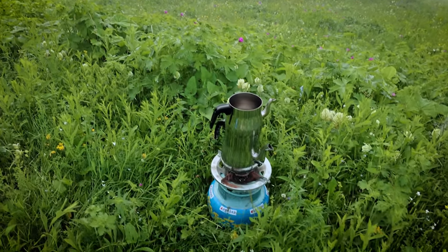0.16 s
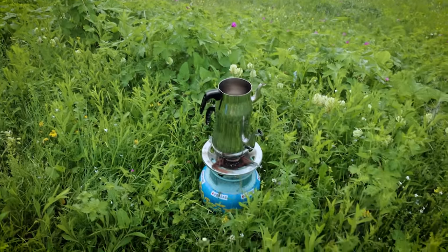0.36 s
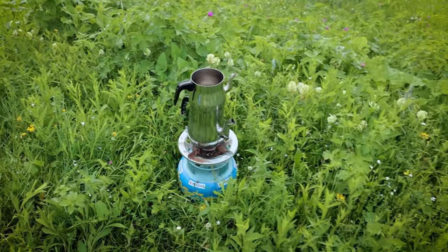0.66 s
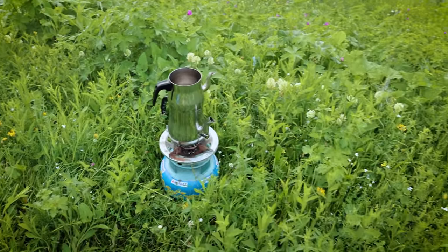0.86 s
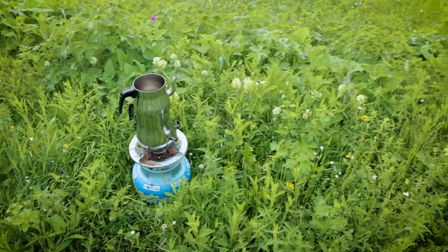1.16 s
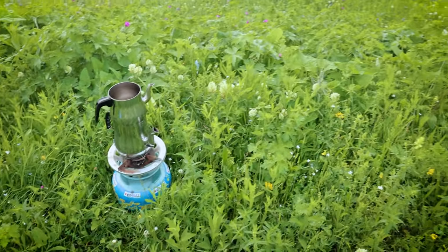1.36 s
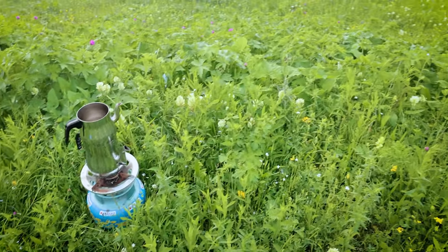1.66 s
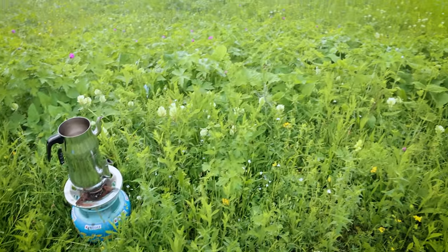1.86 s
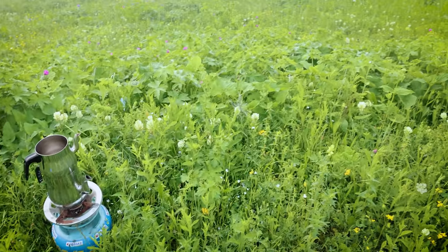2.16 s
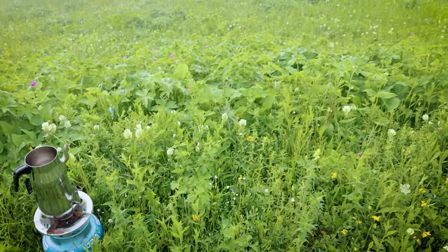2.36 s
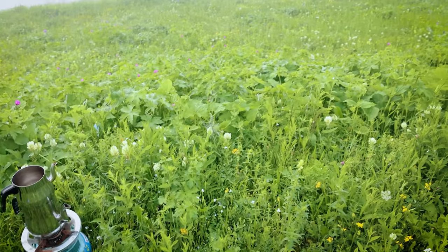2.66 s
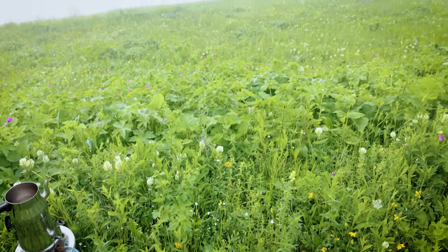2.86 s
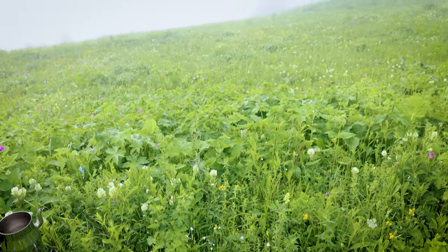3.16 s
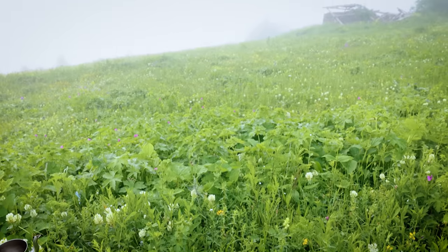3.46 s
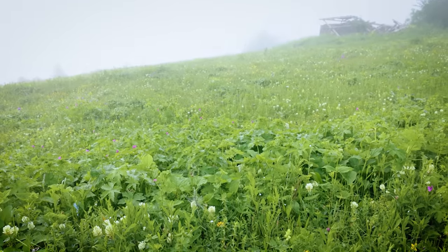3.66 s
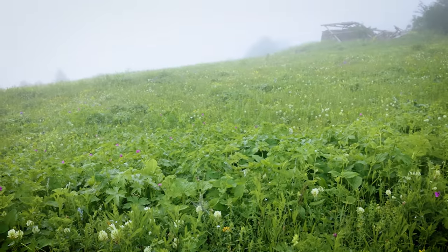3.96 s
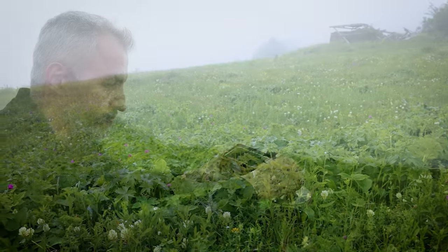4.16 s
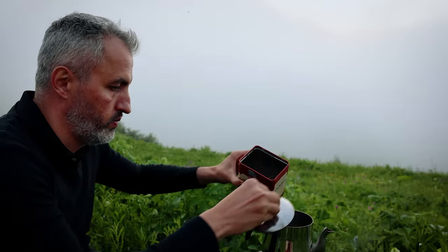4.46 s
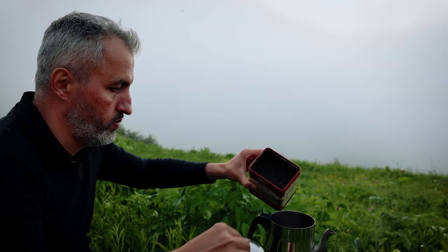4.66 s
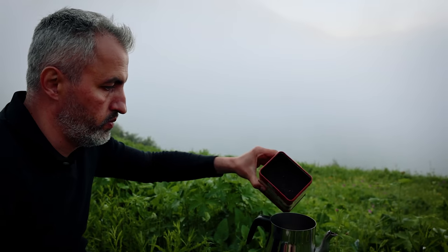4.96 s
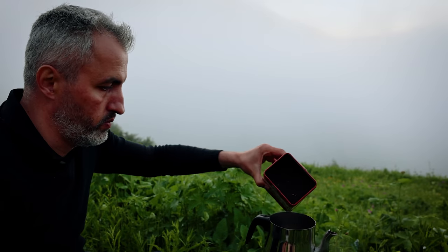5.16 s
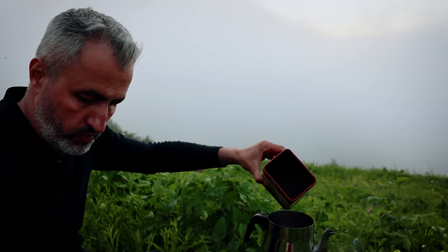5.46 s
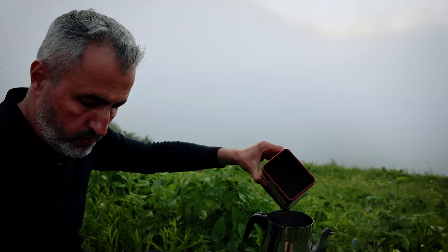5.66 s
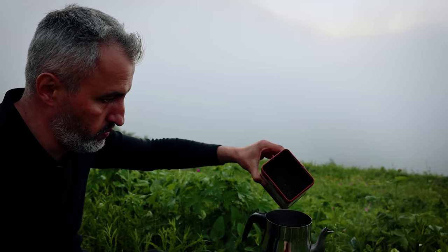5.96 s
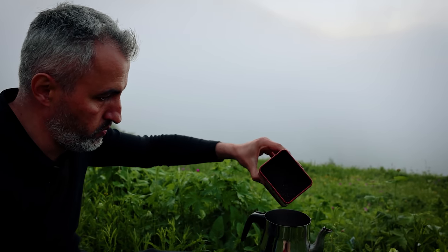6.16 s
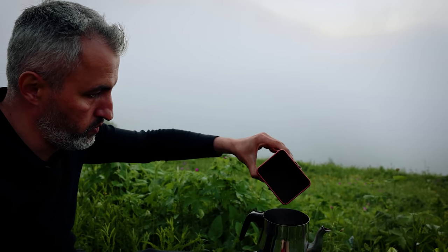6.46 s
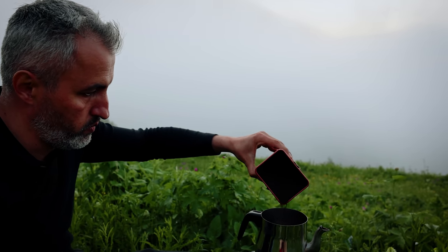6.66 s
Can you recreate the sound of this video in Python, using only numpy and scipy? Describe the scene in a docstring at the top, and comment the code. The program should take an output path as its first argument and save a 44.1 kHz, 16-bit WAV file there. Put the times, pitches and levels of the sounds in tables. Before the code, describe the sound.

From 0 to 4.3 seconds, a quiet meadow: soft, dull moving air, a faint grass stir at the start and again near 1.2, and many small distant birds making short, mostly falling whistles. Nearer birds slur clear tones between about 2 and 6 kHz; the strongest are a steep fall at 0.9, a rise at 1.2 and another fall at 1.4. Afterwards the calls are fainter, with two tiny grass ticks around 3.8. At 4.28 the scene switches almost instantly to a louder, close gas stove: resonant rushing gas, a wavering high hiss, low rumble and irregular little spits. At 5.98 a tin cracks once against a metal rim, ringing briefly before being choked. From 6.2 to 6.6 the flame flutters in low ragged puffs; the hiss surges near 6.8. Dry, open and almost mono.

```python
"""Songbirds whistle in long glides, some near and many far, over soft moving air in a mountain meadow.
Then, abruptly, a gas stove is close by: its jet hisses and its flame rumbles, flutters and spits under a teapot.
A tea tin knocks once against the pot's rim. Almost mono, with no walls around.
Birds are gliding sines with ground bounce and scatter; air, grass, gas and flame are shaped noise;
the knock is a crack of noise over decaying metal modes."""
import sys
import numpy as np
from scipy import signal
from scipy.fft import rfft, irfft, next_fast_len
from scipy.io import wavfile
from scipy.ndimage import map_coordinates

SR = 44100
rng = np.random.default_rng(int(sys.argv[2]) if len(sys.argv) > 2 else 0)


def store_pcm(level_fs):
    """Save levels as 16-bit WAV."""
    pcm = np.round(np.clip(level_fs, -1, 1) * 32767).astype(np.int16)
    wavfile.write(sys.argv[1], SR, np.atleast_2d(pcm).T)


N = 300321
STOVE_ON = 4.281  # (s) the stove replaces the meadow here


def amp(db):
    """Level law: decibels to amplitude gain."""
    return 10 ** (np.asarray(db) / 20)


def unit(x):
    """Normalisation: x at rms 1."""
    return x / np.sqrt(np.mean(x ** 2) + 1e-20)


def clock():
    """Sampling: the time of each sample in seconds."""
    return np.arange(N) / SR


def along(points, hz):
    """Logarithmic interpolation: (Hz, value) points read on a log frequency axis."""
    f, v = np.transpose(points)
    return np.interp(np.log(hz + 1), np.log(f + 1), v)


def curves(rows, t):
    """Linear interpolation: each column after the time, read at times t."""
    s, *cols = np.transpose(rows)
    return [np.interp(t, s, c) for c in cols]


def wobble(rate):
    """Slow modulation: a smooth random curve through rate knots a second."""
    t = clock()
    coarse = t[::32]
    knots = rng.standard_normal(2048)
    curve = map_coordinates(knots, [coarse * rate + 2], mode="wrap")
    return np.interp(t, coarse, curve)


def bell(x, centre, width):
    """Gaussian envelope: a rounded hump, width wide at half height."""
    return 2 ** -((2 * (x - centre) / width) ** 2)


def filtered(x, response):
    """Linear filtering: the spectrum of x times a response of frequency."""
    m = next_fast_len(N + SR // 2)
    hz = np.fft.rfftfreq(m, 1 / SR)
    return irfft(rfft(x, m) * response(hz), m)[..., :N]


def noise(colour_db):
    """Coloured noise: rms 1, with a spectrum in dB given as a function of Hz."""
    white = rng.standard_normal(N)
    return unit(filtered(white, lambda hz: amp(colour_db(hz))))


def turbulence(gain, patchy_db, size=512):
    """Turbulent noise: rms 1, shaped by gain(Hz, s), with random patches of strength in time and pitch."""
    hz, t, z = signal.stft(rng.standard_normal(N), SR, nperseg=size)
    patch = np.outer(signal.windows.hann(size // 64), signal.windows.hann(size // 16))
    field = signal.fftconvolve(rng.standard_normal(z.shape), patch, "same")
    shaped = z * gain(hz[:, None], t) * amp(patchy_db * unit(field))
    return unit(signal.istft(shaped, nperseg=size)[1][:N])


THROAT_HZ, THROAT_WIDTH_HZ = 3820, 280  # a note swells as its pitch sweeps through the throat's resonance
NOTE_ARCH_DB = 2.5  # the middle of a note over its ends, before the throat


def whistle(start, length, pitches, db, throat, waver, fade=0.0036):
    """Frequency glide: one pure tone slurs through three pitches, arched and lifted by the throat's resonance."""
    first, size = round(start * SR), round(length * SR)
    u = np.linspace(0, 1, num=size)
    start_hz, half_hz, end_hz = pitches
    bend = np.clip((half_hz - start_hz) / (end_hz - start_hz + 1e-9), .05, .95)
    slur = u * bend / (u * bend + (1 - u) * (1 - bend))
    hz = start_hz + (end_hz - start_hz) * slur
    resonance = (1 + (2 * (hz - THROAT_HZ) / THROAT_WIDTH_HZ) ** 2) ** (-throat / 2)
    swell = resonance * amp(NOTE_ARCH_DB * np.sin(np.pi * u))
    edges = np.clip(np.minimum(u, 1 - u) * length / fade, 0, 1)
    level = edges * swell / swell.max() * amp(db + waver[first:first + size])
    note = np.zeros(N)
    note[first:first + size] = level * np.sin(2 * np.pi * np.cumsum(hz) / SR)
    return np.sqrt(2) * note  # so that db is an rms level


def hillside(x, t60):
    """Diffuse scattering: grass and slope return x as an exponentially decaying noise tail."""
    t = np.arange(SR // 4) / SR
    tail = rng.standard_normal(len(t)) * amp(-60 * t / t60)
    return signal.fftconvolve(x, tail / np.linalg.norm(tail))[:N]


GROUND_LAG_S, GROUND_DB = .0024, -10  # the bounce off the ground ripples each sweep
# Slurred notes of the nearer birds. Each row: start in seconds, length in seconds, start pitch in Hz,
# halfway pitch in Hz, end pitch in Hz, rms level at the peak in dB before waver, throat resonance from 0 to 1.
WHISTLES = [ (0.087, .13, 2390, 2277, 2225, -59, 0), (0.146, .15, 2860, 2770, 2690, -61.5, 0),
            (0.312, .19, 2340, 2260, 2060, -62, 0), (0.313, 0.1, 3050, 3650, 3930, -60.5, .4),
            (0.393, 0.072, 3980, 3640, 3030, -59.5, .4), (.625, 0.046, 4400, 3760, 2420, -61, .3),
            (.68, 0.088, 2750, 3230, 3510, -62, .5), (.75, .083, 3360, 3960, 4170, -49.5, 0.4),
            (.785, 0.042, 6050, 5550, 4750, -67.5, 0), (.862, 0.045, 4560, 4530, 4480, -61, 0),
            (.9, 0.18, 6100, 4040, 3000, -42.5, 0.97), (1.065, .035, 3020, 3030, 3130, -53.5, 0),
            (0.929, 0.11, 4900, 3180, 2670, -60.5, 0.1), (1.155, 0.032, 2880, 2580, 2210, -54, 1),
            (1.184, 0.13, 2200, 3390, 3870, -41.5, 0.93), (1.37, .016, 4620, 3950, 3410, -59, 0),
            (1.384, 0.024, 3370, 4520, 5000, -53.5, 0.1), (1.435, .16, 4950, 2850, 2290, -47.5, .5),
            (1.445, 0.16, 3050, 3440, 3880, -63.5, 0), (1.79, 0.028, 4040, 3080, 2950, -62, 0),
            (1.842, 0.22, 3600, 4020, 5000, -58, 0.1), (1.84, 0.27, 4170, 2740, 2060, -69, 0),
            (2.11, 0.065, 5050, 4320, 3730, -63, 0), (2.242, .038, 4460, 3700, 2400, -54.5, 0.26),
            (2.33, 0.085, 2360, 2110, 2070, -60.5, 0), (2.55, 0.11, 3280, 3530, 3680, -67, 0),
            (2.66, 0.13, 3370, 2880, 2250, -68, 0), (3.08, .2, 2040, 2004, 1950, -69.5, 0),
            (3.125, 0.16, 5220, 3480, 2940, -66, 0), (3.225, 0.091, 6150, 4480, 3900, -61, 0),
            (3.3, 0.094, 2290, 2310, 2240, -67.5, 0), (3.33, 0.15, 3900, 3710, 3660, -66, 0),
            (3.453, .09, 2740, 3200, 3680, -63, 0), (3.549, 0.099, 5680, 3780, 2830, -61.5, 0.1),
            (3.659, 0.2, 3380, 4030, 4590, -69, 0.1), (3.85, 0.039, 4600, 4840, 4920, -60, 0),
            (4.1, .065, 4100, 3900, 3630, -65.5, 0), (4.195, 0.05, 3960, 3600, 3160, -60.5, 0),
            (4.17, 0.13, 3140, 3460, 3740, -59, .6)]


def near_birds():
    """Interference and scattering: whistles meet their ground bounce; fainter notes arrive more as scatter."""
    waver, direct, scattered = 1.9 * wobble(70), np.zeros(N), np.zeros(N)
    for start, length, *pitches, db, throat in WHISTLES:
        note = whistle(start, length, pitches, db, throat, waver)
        share = np.clip(amp(-66 - db) ** 2, .015, .35)  # scattered part of the power
        direct += np.sqrt(1 - share) * note
        scattered += np.sqrt(share) * note
    grounded = filtered(direct, lambda hz: 1 + amp(GROUND_DB) * np.exp(-2j * np.pi * hz * GROUND_LAG_S))
    return grounded + hillside(scattered, t60=0.3)


# Course of the gas jet. Each row: time in seconds, hiss level in dB before trims,
# reference pitch in Hz that the hiss bands follow at fixed ratios.
JET = [(4.3, -51.5, 7250), (4.34, -53, 7100), (4.76, -52, 7120), (4.81, -62, 6850), (4.87, -48, 7440),
       (4.97, -53, 7100), (5.23, -50, 7280), (5.25, -56, 7000), (5.31, -48, 7130), (5.54, -52, 7090),
       (5.91, -53.5, 7400), (5.99, -51, 7110), (6.03, -58, 7080), (6.05, -52, 7200), (6.46, -58, 6830),
       (6.58, -54.5, 7430), (6.77, -45.5, 7280), (6.8, -48, 6990)]


def jet_levels():
    """Common drive: the jet's level in dB, and its surge above the mean that lifts every part of the hiss."""
    jet_db, _ = curves(JET, clock())
    return jet_db, jet_db - jet_db[round(STOVE_ON * SR):].mean()


def jet_band(ratio, width_hz):
    """Band-limited turbulence: a steep-sided band of hiss that follows the pitch of the jet."""
    def band(hz, t):
        centre = ratio * curves(JET, t)[-1]
        return 1 / (1 + (2 * (hz - centre) / width_hz) ** 4)
    return turbulence(band, patchy_db=2.3)


def jet_hiss(jet_db, surge_db):
    """Jet noise: a main band, a weaker shoulder and a high sizzle wander together in pitch."""
    jet = amp(jet_db - 0.5 + 0.37 * wobble(25)) * jet_band(ratio=.98, width_hz=1210)
    shoulder = amp(jet_db - 8.5 + 1.2 * wobble(7)) * jet_band(ratio=1.11, width_hz=770)
    sizzle = amp(-60.0 + 0.35 * surge_db + 1.2 * wobble(9.8)) * jet_band(ratio=1.573, width_hz=1800)
    return jet + shoulder + sizzle


# Smooth spectrum of gas in the mixing tube. Each row: frequency in Hz, relative level in dB per Hz.
RUSH = [(300, -1.5), (800, -6.5), (1100, -8.5), (2600, -4), (4100, -2.5), (4700, -12), (5700, -17.5),
        (9000, -13), (11000, -14), (13500, -17), (15700, -18)]
# Resonances of the mixing tube. Each row: centre in Hz, width in Hz, height in dB.
TUBE = [(1368, 320, 12.4), (1610, 150, 5.4), (2090, 460, 5), (3090, 390, 5.8), (3750, 560, 8.1)]


def gas_rush(surge_db):
    """Tube resonance: the turbulence of rushing gas is lifted at the mixing tube's resonances."""
    def tube(hz, t):
        peaks = sum(db * bell(hz, centre, width) for centre, width, db in TUBE)
        return amp(along(RUSH, hz) + peaks)
    return amp(-47.0 + 0.14 * surge_db + 0.15 * wobble(25)) * turbulence(tube, patchy_db=1.33)


# Spectrum of the flame's rumble. Each row: frequency in Hz, relative level in dB per Hz.
FLAME = [(13, -31), (22, -31), (48, 1), (136, -2.5), (206, 1), (390, -8), (443, -4), (581, -11),
         (1000, -13), (1300, -38), (2200, -120)]
# Course of the rumble. Each row: time in seconds, level in dB before a small trim.
FLAME_LEVEL = [(4.3, -58), (4.65, -53), (6.09, -54), (6.21, -44), (6.22, -47.5), (6.35, -50), (6.6, -48),
               (6.74, -57), (6.8, -48)]


def flame_rumble():
    """Combustion noise: low coloured noise rises and falls with the flame."""
    flame_db, = curves(FLAME_LEVEL, clock())
    return amp(flame_db - .3 + 1.2 * wobble(30)) * noise(lambda hz: along(FLAME, hz))


def stove():
    """Superposition: gas rushes through the tube, the jet hisses and the flame rumbles."""
    jet_db, surge_db = jet_levels()
    return gas_rush(surge_db) + jet_hiss(jet_db, surge_db) + flame_rumble()


# The tin against the pot's rim, as start in seconds and overall level in dB.
KNOCK = (5.9822, -27.5)
# Modes of tin and pot. Each row: frequency in Hz, relative level in dB, t60 in seconds before the grip.
METAL = [(515, -7, .16), (785, 1, .15), (1192, -7, .2), (1310, -6, .12), (1443, -9, .16), (1960, 0, .13),
         (2297, -5, .22), (2390, 0, .25), (2436, -1, .24), (2480, -1, .17), (2730, -6, .14),
         (2821, -3, .19), (3341, -3, .17), (3486, -3, .14), (3622, -4, .14), (3725, -4, .11),
         (3897, -4, .1), (4110, -4, .12), (4430, -11, .15), (4592, -9, .17), (5125, -14, .16),
         (5566, -16, .16), (5737, -13, .17)]
# Spectrum of a crack, also used for ticks in the grass. Each row: frequency in Hz, relative level in dB per Hz.
CRACK = [(200, -26), (500, -7), (800, -2), (1300, 0.5), (4000, -2), (5200, -13), (8000, -16), (15000, -36)]


def clink():
    """Modal impact: a sharp crack with a longer wash, and a ring of metal modes damped by the hand."""
    s, db = KNOCK
    t, out = np.arange(SR // 2) / SR, np.zeros(N + SR)
    ring = sum(amp(level - 60 * t / t60) * np.sin(2 * np.pi * (hz * t + rng.random()))
               for hz, level, t60 in METAL)
    grip = amp(-250 * np.maximum(t - .052, 0))  # pressing on the rim chokes the ring
    dying = amp(5.5 - 60 * t / 0.01) + amp(-8.5 - 60 * t / 0.17)  # crack, then wash
    crack = dying * noise(lambda hz: along(CRACK, hz))[:len(t)]
    onset = 1 - np.exp(-t / 0.00025)
    out[round(s * SR):][:len(t)] = amp(db) * grip * (amp(-5.5) * ring + crack) * onset
    return out[:N]


# Puffs of the flame in the draught. Each row: centre in seconds, level in dB before waver,
# half of the width at half height in seconds, brightness as a low-pass corner in Hz.
PUFFS = [(4.659, -49, 0.08, 60), (4.953, -46.5, 0.0052, 400), (5.089, -45, 0.0048, 1500),
         (5.117, -47, 0.01, 90), (5.536, -43, 0.01, 800), (6.2, -42, 0.012, 200),
         (6.285, -41.5, 0.0079, 800), (6.331, -44, 0.0035, 2480), (6.455, -45, 0.012, 500),
         (6.577, -43.5, 0.035, 1310)]


def flutter():
    """Unsteady combustion: draughts tear at the flame in short, ragged puffs of low-passed noise."""
    t, out = np.arange(-SR // 8, SR // 8) / SR, np.zeros(N + SR)
    hz = np.fft.rfftfreq(len(t), 1 / SR)
    for s, db, length, bright_hz in PUFFS:
        lowpass = 1 / np.sqrt(1 + (hz / bright_hz) ** 2.06)
        puff = irfft(rfft(rng.standard_normal(len(t))) * lowpass, len(t))
        out[round((s + t[0]) * SR):][:len(t)] += amp(db) * bell(t, 0, 2 * length) * unit(puff)
    return out[:N] * amp(0.59 * wobble(150))


def sputter(rate=22):
    """Poisson process: tiny spits of the flame fall at random, rate a second on average."""
    strength = amp(3 * np.minimum(rng.exponential(size=N), 3))
    spits = (rng.random(N) < rate / SR) * strength
    swell = signal.fftconvolve(spits, signal.windows.hann(SR // 200), "same")  # 5 ms each
    return amp(-53.5) * swell * noise(lambda hz: -10 * np.log10(1 + (hz / 2500) ** 2))


FAR_DB, FAR_SPREAD_DB = -72.5, 5  # the faintest far notes before waver, and the range above them
FAR_LOW_HZ, FAR_RANGE_HZ = 1950, 1900  # the far notes bottom out somewhere in this range
FAR_GLIDE_HZ, FAR_NOTE_S = 950, .075  # scale of their sweep, and their mean length


def far_birds(count=135):
    """Distant chorus: short glides scatter off the slope; most fall and flatten out, some rise."""
    song, waver = np.zeros(N), 2.8 * wobble(50)
    for k, (when, length, low, span, turn, loud) in enumerate(rng.random((count, 6))):
        start = (k + when) / count * STOVE_ON
        shape = np.array([1, .3, 0] if turn < .65 else [0, .28, .5])
        pitches = FAR_LOW_HZ + FAR_RANGE_HZ * low + FAR_GLIDE_HZ * (.5 + span) * shape
        db = FAR_DB + FAR_SPREAD_DB * loud
        song += whistle(start, FAR_NOTE_S * (.5 + length), pitches, db, 0, waver)
    return song + amp(-6) * hillside(song, t60=0.24)


AIR_DB, GRASS_DB = -58, -84  # mean level of the air, and of the rustle between stirs
# Spectrum of the meadow air. Each row: frequency in Hz, relative level in dB per Hz.
AIR = [(15, -56), (25, -4.5), (136, 0.5), (267, -1.5), (1020, -2), (1200, -5), (2060, -8.5), (3630, -9.5),
       (5140, -18.5), (11500, -28.5), (14300, -30.5), (15500, -33)]
# Stirs of the grass. Each row: centre in seconds, level in dB, width at half height in seconds.
BREEZE = [(.2, -64.5, .26), (.61, -73, 0.11), (1.217, -68.5, 0.17)]
# Spectrum of the rustle. Each row: frequency in Hz, relative level in dB per Hz.
GRASS = [(2000, -2), (4800, 9.5), (6500, -4), (9500, 1), (12000, -6.5), (15500, -8)]
# Small ticks in the grass. Each row: centre in seconds, level in dB.
TICKS = [(3.791, -52), (3.853, -49)]


def meadow():
    """Broadband background: coloured noise makes soft distant air, a light rustle of grass and two ticks."""
    t = clock()
    air = amp(AIR_DB + 1.1 * wobble(5.835)) * noise(lambda hz: along(AIR, hz))
    stir = amp(GRASS_DB) + sum(amp(db) * bell(t, s, length) for s, db, length in BREEZE)
    grass = stir * noise(lambda hz: along(GRASS, hz))
    ticks = sum(amp(db) * bell(t, s, 0.0036) for s, db in TICKS)
    return air + grass + ticks * noise(lambda hz: along(CRACK, hz))


# Spectrum of the side signal. Each row: frequency in Hz, relative level in dB per Hz.
WIDTH = [(30, 4.5), (100, -4), (300, -9), (1200, -36.5), (3500, -67), (7000, -42), (9000, -27),
         (12000, -24), (15000, -20)]


def scene():
    """Mid-side stereo: the meadow gives way to the stove in about 2 ms; the channels differ only faintly."""
    close = np.clip((clock() - STOVE_ON) / 0.0023 + .5, 0, 1)
    outdoors = meadow() + near_birds() + far_birds()
    cooking = stove() + sputter() + flutter() + clink()
    mid = (1 - close) * outdoors + close * cooking
    side_level = (1 - close) * amp(-104) + close * amp(-65.5)
    side = side_level * noise(lambda hz: along(WIDTH, hz))
    return np.array([mid + side, mid - side])


TOP_HZ = 15780  # upper band limit


def record(dry):
    """Band limiting: nothing is kept at or above the top frequency."""
    return filtered(dry, lambda hz: hz < TOP_HZ)


dry = scene()
out = record(dry)
store_pcm(out)
```